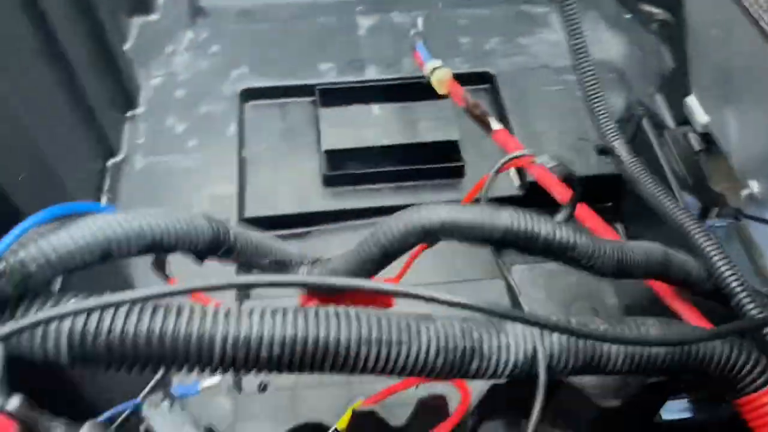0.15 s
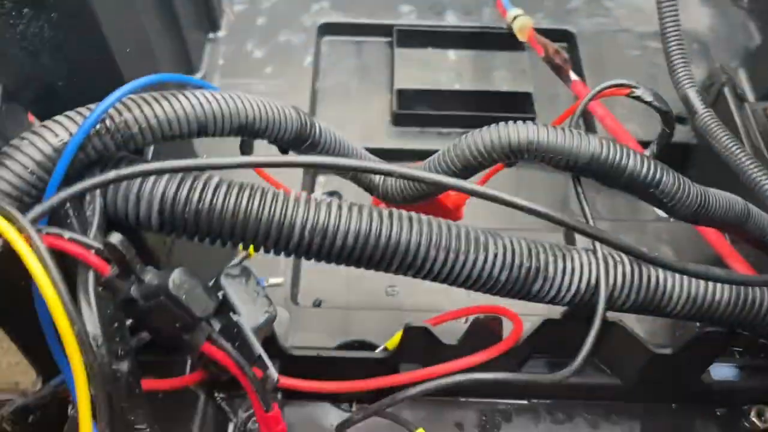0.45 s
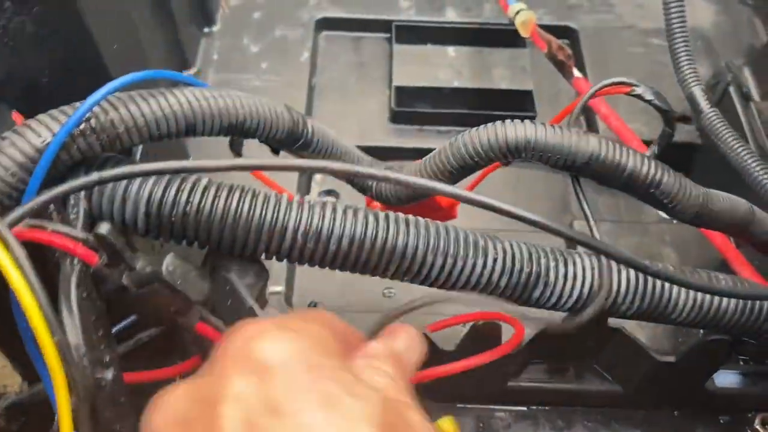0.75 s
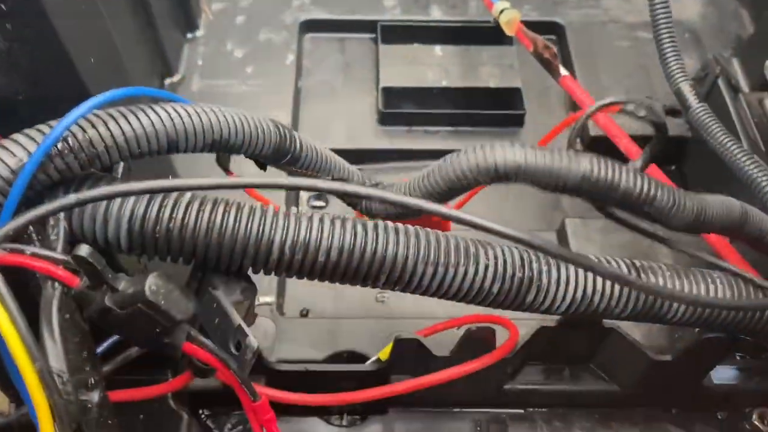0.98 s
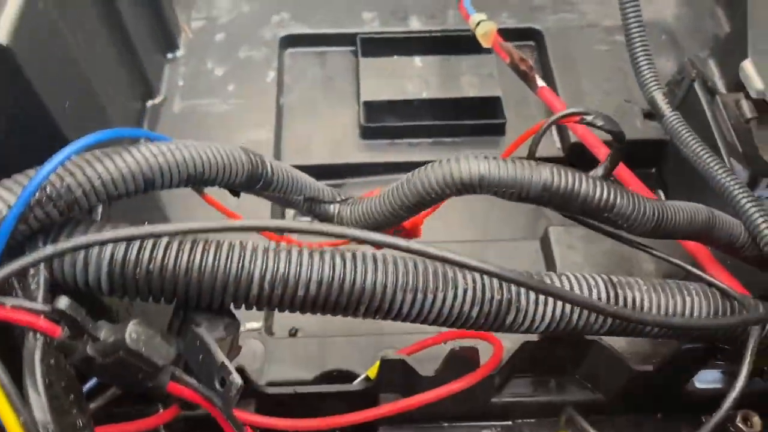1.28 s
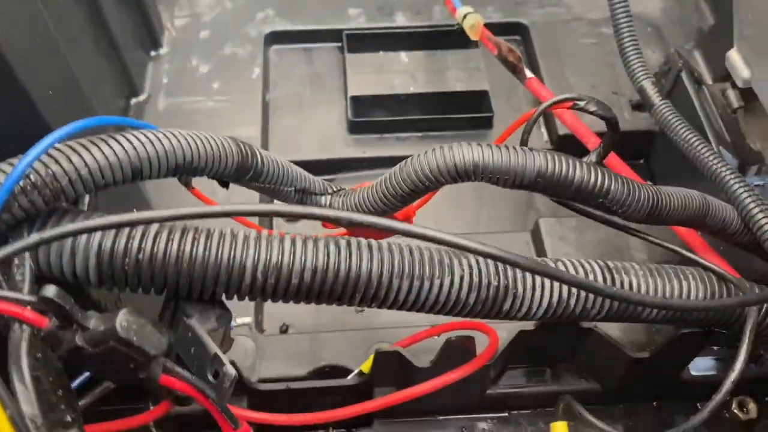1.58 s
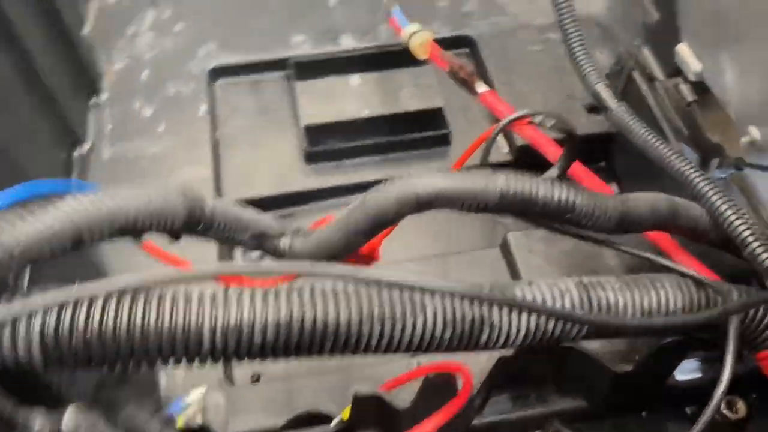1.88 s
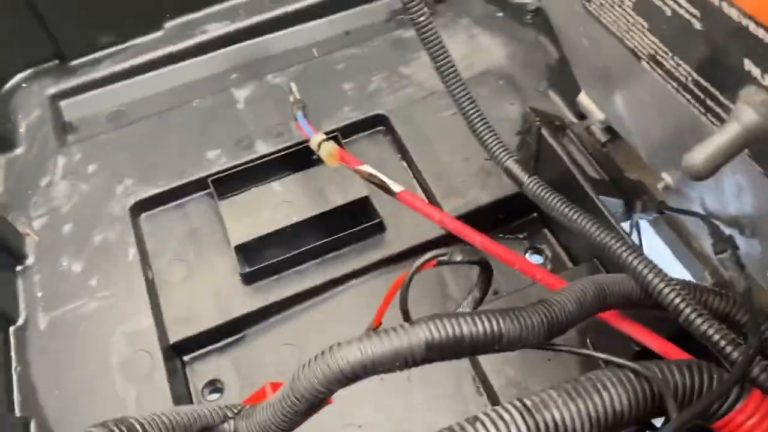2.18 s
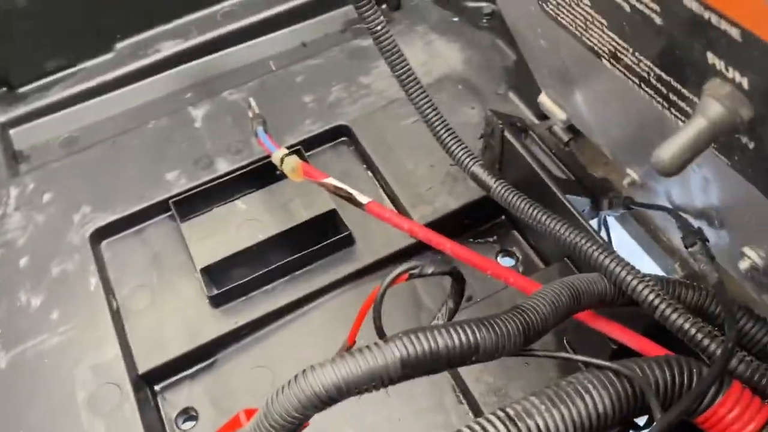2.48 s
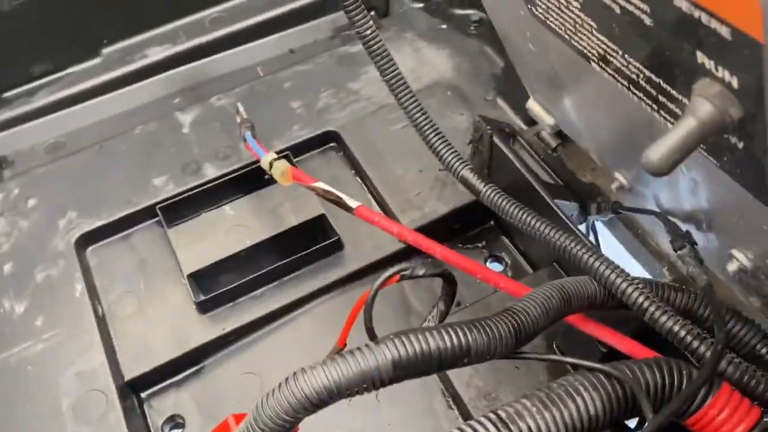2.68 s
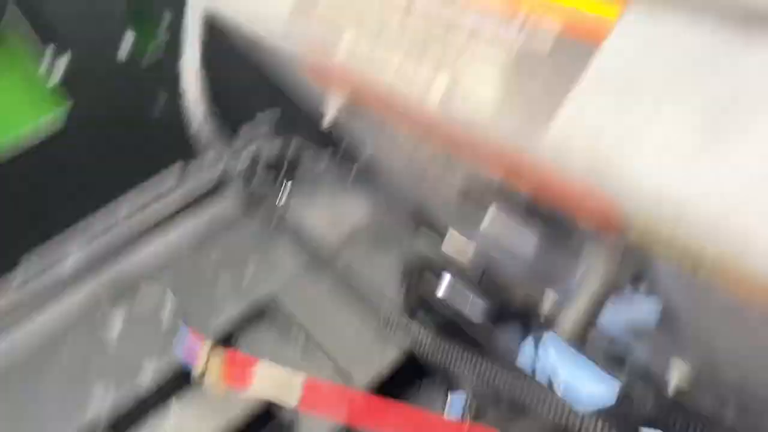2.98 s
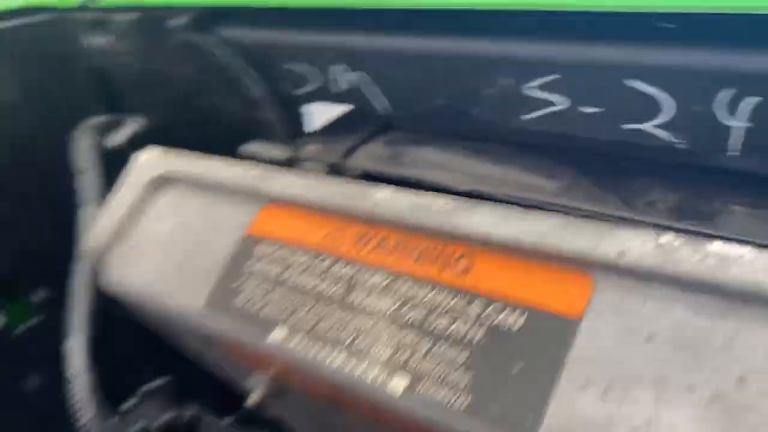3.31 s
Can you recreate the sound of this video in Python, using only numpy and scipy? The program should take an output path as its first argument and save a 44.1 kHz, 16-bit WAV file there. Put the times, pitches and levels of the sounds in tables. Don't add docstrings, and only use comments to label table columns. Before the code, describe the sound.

Ribbed plastic wire looms tick and scrape lightly in a hollow tray at 0 s, with small tugs near 0.5 and 0.95 s. After a near-quiet lull from 1.1 to 1.6 s, sharp snaps and rasping drags run to 2.5 s. Then the loom clatters, knocking and booming against the plastic, loudest around 2.9 and 3.2-3.45 s. Close phone pickup, short compartment echo, faint outdoor rumble, hiss and low handling bumps.

```python
import sys
import numpy as np
from scipy import signal
from scipy.fft import rfft, irfft, next_fast_len
from scipy.io import wavfile
from scipy.ndimage import uniform_filter1d, map_coordinates

SR = 44100
rng = np.random.default_rng(int(sys.argv[2]) if len(sys.argv) > 2 else 0)


def store_wav(level_fs):
    pcm = np.round(np.clip(np.atleast_2d(level_fs), -1, 1) * 32767)
    wavfile.write(sys.argv[1], SR, pcm.T.astype(np.int16))


def amplitude_ratio(level_db):
    exponent = np.asarray(level_db, float) / 20
    return 10 ** exponent


N = 152145

# t/s, snap level/dB, pitch f/Hz
RIB_TICKS = [(0.0014, -14.5, 3500), (0.0273, -27, 2040), (0.0712, -25.5, 1290), (0.1179, -27.5, 4700),
             (0.1446, -27, 1570), (0.1943, -33, 2310), (0.2067, -24.5, 1460), (0.2398, -30, 1520),
             (0.2837, -34.5, 1630), (0.341, -31, 1250), (0.408, -37, 4760), (0.432, -29.5, 7540),
             (0.4454, -37, 1680), (0.4545, -34.5, 1800), (0.4674, -37, 2380), (0.4823, -33, 1260),
             (0.5089, -25, 884), (0.7782, -39.5, 4900), (0.6015, -27, 7000), (0.8448, -26.5, 2110),
             (0.8785, -25, 3630), (0.9012, -29, 3220), (1.0266, -27, 1180), (1.0403, -25.5, 1174),
             (1.1025, -36, 790), (1.6343, -33.5, 3500), (1.6417, -30, 1000), (1.7959, -19, 1190),
             (1.9431, -24, 1410), (1.991, -14, 1040), (2.1281, -24, 1480), (2.1536, -32, 1510),
             (2.3646, -33, 1510), (2.835, -19, 926), (2.851, -29, 910), (2.8635, -15, 3920),
             (2.9503, -14.5, 1740), (3.0735, -28, 1200), (3.1972, -17, 910), (3.265, -9, 930)]
# t/s, snap level/dB, pitch f/Hz, tray knock level/dB, fade by 60 dB t/s
TUG_SNAPS = [(0.5342, -13, 3780, -40, 0.015), (0.9461, -16.5, 1450, -39.5, 0.055),
             (1.6626, -12.5, 1177, -26, 0.0093), (1.7826, -26, 2300, -26.5, 0.031),
             (1.809, -6, 3710, -45, 0.023), (1.8643, 3, 4430, -37, 0.021),
             (1.9078, -14.5, 1725, -35, 0.034), (1.9605, -14.5, 1583, -57, 0.091),
             (1.9836, -6, 3330, -21.5, 0.035), (2.0144, 6.5, 1403, -47, 0.019),
             (2.1969, -11, 2120, -28.5, 0.039), (2.2344, 3, 3500, -15, 0.027),
             (2.2346, -1, 10200, -50, 0.042), (2.249, -8, 3330, -20, 0.036),
             (2.028, -16.5, 1240, -28.5, 0.03), (2.4028, -16, 820, -21.5, 0.043),
             (2.4673, -22.5, 2400, -30, 0.046)]
# t/s, snap level/dB, pitch f/Hz, tray knock level/dB, fade by 60 dB t/s
LOOM_CLATTER = [(2.544, -12.5, 1980, -13, 0.044), (2.6655, -9, 1500, -14, 0.037),
                (2.7561, -19.5, 1640, -42, 0.034), (2.775, -44, 1420, -20.5, 0.066),
                (2.8555, -18, 4280, -28, 0.018), (2.8789, 1, 2850, -8.5, 0.039),
                (2.9122, -17, 1200, -18, 0.023), (2.9708, 4.5, 1595, -31, 0.028),
                (3.1426, -45, 1360, -13, 0.1), (3.1649, -11, 1290, -18, 0.051),
                (3.1854, -30, 1240, -21.5, 0.18), (3.2167, -13, 1110, -4, 0.039),
                (3.2290, -10, 1090, -8, 0.045), (3.246, -30, 1116, -18.5, 0.085),
                (3.278, -7.5, 2220, -10, 0.05), (3.293, -8, 3130, -18, 0.034),
                (3.3452, -0.5, 4020, -26.5, 0.026), (3.3454, -3.5, 7280, -50, 0.045),
                (3.3664, -26, 1290, -17.5, 0.014), (3.3805, -16, 1200, -21, 0.099),
                (3.4095, 2.5, 1144, -5.5, 0.024), (3.4165, -0.5, 1290, -8.5, 0.036),
                (3.4434, -3, 3960, -30, 0.054)]
# f/Hz, level per Hz/dB
CRACK_COLOUR = [(300, -109), (800, -5), (2000, 5.5), (5000, 14), (8000, 15.5), (15500, 15.5), (16300, -56)]
# f/Hz, width f/Hz, level/dB
WALL_TONES = [(355, 35, -5), (425, 34, -3), (590, 80, -5), (700, 50, -2), (780, 60, -3), (1045, 70, -3),
              (1200, 50, -5), (1530, 90, -11), (1720, 90, -11), (2400, 300, -16)]
# start t/s, length t/s, scrape level/dB, pitch f/Hz, weight on the tray level/dB
DRAG_STROKES = [(0, 0.12, -39, 1600, -3.5), (0.524, 0.23, -45.5, 4000, -1), (0.575, 0.17, -53.5, 1350, 9),
                (0.93, 0.2, -55, 1880, -3), (1.647, 0.22, -44.5, 1480, 0.5),
                (1.767, 0.35, -42.5, 3180, 2.5), (1.87, 0.2, -34, 1620, -29), (1.988, 0.19, -51, 1540, 2.5),
                (2.139, 0.28, -38.5, 1380, -9.5), (2.187, 0.13, -33, 2480, -13.5),
                (2.353, 0.11, -38, 1470, -6.5), (2.368, 0.06, -42.5, 10400, -40),
                (2.174, 0.067, -69, 10400, -37), (2.12, 0.091, -83, 4300, -27),
                (0.55, 0.14, -52.5, 4000, -40), (1.958, 0.052, -29, 3600, -35), (0, 0.14, -53.5, 5060, -40),
                (0, 0.15, -58, 11500, -40), (0.95, 0.11, -54, 10900, -40), (2.852, 0.07, -42, 4500, -33),
                (2.47, 0.17, -46.5, 1550, -4), (2.571, 0.094, -46, 1320, -2), (2.69, 0.68, -45, 1170, 2),
                (2.848, 0.1, -36.5, 1870, 0.5), (2.897, 0.23, -37.5, 1670, -32),
                (3.123, 0.14, -39.5, 1370, -4), (3.198, 0.19, -31.5, 1160, -4.5),
                (3.335, 0.58, -31, 1810, 1.5)]
# t/s, level/dB
FLOOR_PUSHES = [(0.001, -32), (0.97, -41), (1.675, -31), (1.704, -29.5), (1.815, -29.5), (1.902, -33),
                (2.003, -33), (2.234, -37), (2.531, -26.5), (2.581, -29.5), (2.61, -33.5), (1.86, -29),
                (1.051, -43), (0.611, -37.5), (2.555, -21), (2.883, -26), (3.147, -25.5), (3.222, -15),
                (3.413, -25)]
# f/Hz, width f/Hz, level/dB
HOLLOW_TONES = [(108, 39, -17.5), (165.7, 19.4, 1), (205.9, 21.2, -2.5), (255.5, 26, -6)]
# f/Hz, fade by 60 dB t/s
BAY_FADE = [(200, 0.38), (2000, 0.091), (10000, 0.086)]
# t/s, half length t/s, level/dB
PHONE_SWAYS = [
    (1.9, 0.13, -44),
    (2.3, 0.12, -50),
    (2.63, 0.12, -40.5),
    (3.205, 0.1, -48),
]
# f/Hz, level per Hz/dB
SWAY_COLOUR = [(20, -40), (35, -8), (48, 4), (85, -5), (130, -40)]
# f/Hz, level per Hz/dB
AIR_COLOUR = [(20, -92), (40, -5.5), (90, -4), (170, -10), (290, -21), (600, -31.5), (2900, -34),
              (9000, -42), (15700, -55), (16200, -107)]
# f/Hz, likeness [0 to 1]
PORT_LIKENESS = [(200, .95), (700, .65), (1600, .3), (4000, .6), (5500, .3), (8000, .95)]
# f/Hz, left over right level/dB
PORT_BALANCE = [(200, -4), (600, 5), (1500, 0), (4000, 4), (8000, 0)]
# f/Hz, left ahead of right [radians]
PORT_LEAD = [(260, -.9), (520, -1.6), (720, -4.4), (1400, -5.6), (7000, -6.3), (8400, -9.3), (9500, -9.55),
             (11000, -12.4), (12900, -15.6), (14000, -15.8), (15800, -19.5)]


def unit(x):
    return x / np.sqrt(np.mean(x ** 2) + 1e-20)


def along(points, hz):
    f, value = np.transpose(points)
    return np.interp(np.log(hz + 1), np.log(f + 1), value)


def wobble(rate):
    knots = rng.standard_normal(int(N * rate / SR) + 4)
    return map_coordinates(knots, [np.arange(N) * rate / SR])


def filtered(x, response):
    m = next_fast_len(N + SR // 2)
    return irfft(rfft(x, m) * response(np.fft.rfftfreq(m, 1 / SR)), m)[..., :N]


def resonance(f, centre, width):
    return 1j * f * width / (centre * centre - f * f + 1j * f * width)


def body(tones):
    return lambda f: sum((-1) ** k * amplitude_ratio(db) * resonance(f, centre, width)
                         for k, (centre, width, db) in enumerate(tones))


def add(track, s, x):
    part = track[..., max(round(s * SR), 0):][..., :x.shape[-1]]
    part += x[..., :part.shape[-1]]


def plastic(ringing, cracking, hz, q, count):
    spread_oct, dull_db_per_oct = 0.36, 16
    n = ringing.shape[-1]
    f = np.fft.rfftfreq(n, 1 / SR) + 1
    k = np.arange(count)[:, None]
    place = (k - count // 2 + rng.uniform(-.3, .3, (count, 1))) / (count // 2 + 1)
    centre = hz * 2 ** (spread_oct * place)
    modes = (resonance(f, centre, centre / q) * (-1) ** k).sum(0)
    ring = modes * resonance(f, hz, hz) ** 2
    ring = unit(np.abs(ring)) * np.exp(1j * np.angle(ring))
    skirt = amplitude_ratio(along(CRACK_COLOUR, f) - dull_db_per_oct * np.log2(1 + f / hz))
    return irfft(rfft(ringing) * ring + rfft(cracking) * unit(skirt), n)


def hits():
    tick_fade_s, tick_knock_db = 0.019, -14
    snap_db, crack_db, knock_db_all = -15.5, -2, 17.5
    crack_life, knock_life = 1, 0.64
    chatter_s, chatter_db = 0.18, -16.5
    blow_level, blow_s = 0.088, 6e-5
    spot_oct, spot_db, damping = 0.015, 2.5, 1.78
    snap, knock = np.zeros((2, 2, N))
    t = np.arange(SR // 6) / SR
    f = np.fft.rfftfreq(len(t), 1 / SR)
    ticks = [(s, db, hz, db + tick_knock_db, tick_fade_s) for s, db, hz in RIB_TICKS]
    for s, db, hz, knock_db, fade_s in ticks + list(TUG_SNAPS) + list(LOOM_CLATTER):
        late = rng.random(3) * chatter_s * fade_s
        size = amplitude_ratio(chatter_db + 3 * rng.standard_normal(3))
        blow = blow_level * np.sqrt(fade_s * SR) * np.exp(-t / blow_s)
        blow = blow * [[1], [rng.uniform(-0.71, 1)]]

        def burst(life):
            fade = sum(g * amplitude_ratio(-60 * np.abs(t - d) / life) * (t >= d)
                       for d, g in zip([0, *late], [1, *size]))
            return blow + rng.standard_normal((2, len(t))) * fade

        cracking = amplitude_ratio(crack_db) * burst(fade_s * crack_life)
        patch = plastic(burst(fade_s), cracking, hz, q=9, count=7)
        add(snap, s, amplitude_ratio(db + snap_db) * patch[:, :-SR // 50])
        spot = []
        for centre, width, level in WALL_TONES:
            a, b = rng.standard_normal(2)
            spot.append((centre * 2 ** (spot_oct * a), width * damping, level + spot_db * b))
        walls = irfft(rfft(burst(fade_s * knock_life)) * body(spot)(f), len(t))
        add(knock, s, amplitude_ratio(knock_db + knock_db_all) * walls)
    return snap + knock


def rib_rasp():
    grains_per_s, grain_db, uneven_db, patchy_db = 500, 4, 2, 5
    grain_size = amplitude_ratio(grain_db * np.minimum(rng.exponential(size=N), 2))
    grains = (rng.random(N) < grains_per_s / SR) * grain_size
    rough = 1 + unit(signal.lfilter([1], [1, -.98], grains))
    rough = rough * amplitude_ratio(uneven_db * wobble(40))
    z = signal.stft(rough * rng.standard_normal((2, N)), nperseg=256)[2]
    patches = uniform_filter1d(rng.standard_normal(z.shape[1:]), size=4, axis=0)
    patches = uniform_filter1d(patches, size=9, axis=1)
    return unit(signal.istft(z * amplitude_ratio(patchy_db * unit(patches)), nperseg=256)[1][:, :N])


def drag():
    rise, hiss_db, walls_db, floor_db = 0.2, -1, 23, 26
    rasp = rib_rasp()
    scrape, load = np.zeros((2, N)), np.zeros(N)
    for s, length, db, hz, weight_db in DRAG_STROKES:
        u = np.linspace(0, 1, round(1.474 * length * SR))
        early = u ** (np.log(.5) / np.log(rise / 2.44))
        swell = amplitude_ratio(db) * np.sin(np.pi * early) ** 2
        part = rasp[:, round(s * SR):][:, :len(u)]
        part = part * swell[:part.shape[1]]
        hiss = amplitude_ratio(hiss_db) * part[::-1] * [[1], [-1]]
        add(scrape, s, plastic(part, hiss, hz, q=2.2, count=1))
        add(load, s, amplitude_ratio(weight_db) * swell)
    walls = filtered(rasp * load, body(WALL_TONES))
    floor = filtered(rasp * load * amplitude_ratio(2 * wobble(7.38)), body(HOLLOW_TONES))
    return scrape + amplitude_ratio(walls_db) * walls + amplitude_ratio(floor_db) * floor


def thuds():
    level_db, push_s = 21.5, 0.0085
    push, t = np.zeros((2, N)), np.arange(SR // 20) / SR
    shape = (1 - 2 * (t / push_s) ** 2) * np.exp(-(t / push_s) ** 2)
    for s, db in FLOOR_PUSHES:
        rough = 1 + 1.3 * rng.standard_normal((2, len(t)))
        add(push, s, amplitude_ratio(db + level_db) * rough * shape)
    return filtered(push, body(HOLLOW_TONES))


def bay(x):
    hz, t, z = signal.stft(rng.standard_normal((2, SR // 3)), SR, nperseg=256)
    fade = amplitude_ratio(-60 * t / along(BAY_FADE, hz)[:, None])
    tail = signal.istft(z * fade, SR, nperseg=256)[1]
    return signal.fftconvolve(x, tail / np.linalg.norm(tail[0]), axes=1)[:, :N]


def hand():
    t = np.arange(N) / SR
    noise = rng.standard_normal((2, N))
    low = unit(filtered(noise, lambda hz: amplitude_ratio(along(SWAY_COLOUR, hz)) * (hz < 300)))
    return low * sum(amplitude_ratio(db) * np.exp(-((t - s) / half) ** 2) for s, half, db in PHONE_SWAYS)


def air():
    noise = unit(filtered(rng.standard_normal((2, N)), lambda hz: amplitude_ratio(along(AIR_COLOUR, hz))))
    return amplitude_ratio(-48.5 + 0.09 * wobble(8.5)) * noise


def ports(pair):
    def blend(hz):
        turn = np.arccos(np.clip(along(PORT_LIKENESS, hz), 0, 1)) / 2
        return np.array([np.cos(turn), np.sin(turn)])

    side = np.array([[.5], [-.5]])

    def offset(hz):
        return amplitude_ratio(side * along(PORT_BALANCE, hz)) * np.exp(1j * side * along(PORT_LEAD, hz))

    shared, differing = filtered(pair, blend)
    return filtered(np.array([shared + differing, shared - differing]), offset)


def scene():
    loom = hits() + drag() + thuds()
    return ports(loom + amplitude_ratio(-10.5) * bay(loom) + hand() + air())


def roll_off(x):
    return signal.sosfilt(signal.butter(12, 17150, fs=SR, output="sos"), x)


def record(dry):
    limited = dry / (1 + np.abs(dry) ** 6) ** (1 / 6)
    mix = filtered(limited, lambda hz: 1 / (1 + (hz / 16000) ** 90))
    return roll_off(mix)


dry = scene()
out = record(dry)
store_wav(out)
```